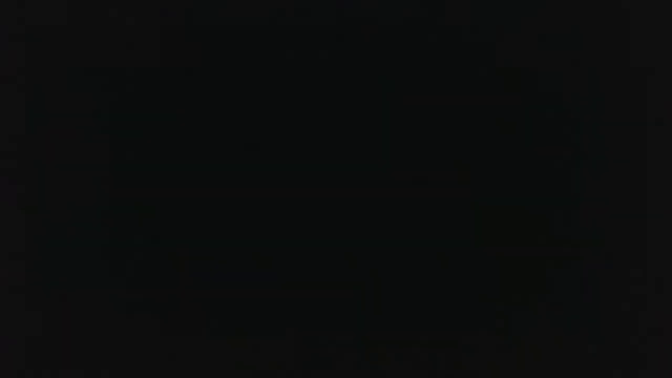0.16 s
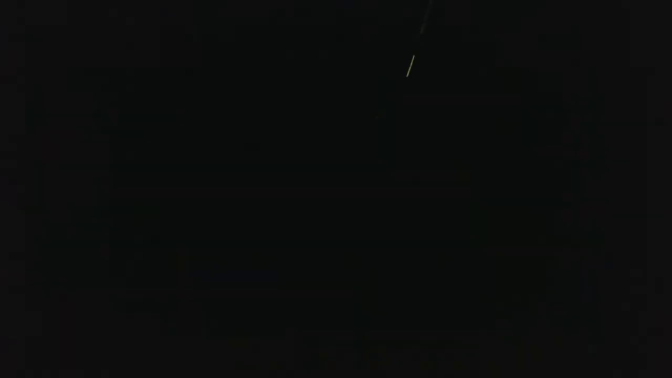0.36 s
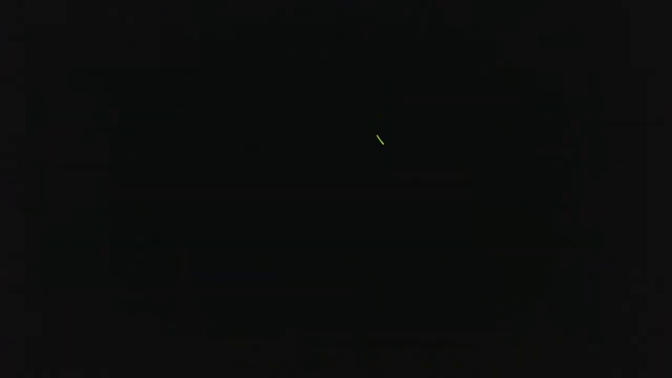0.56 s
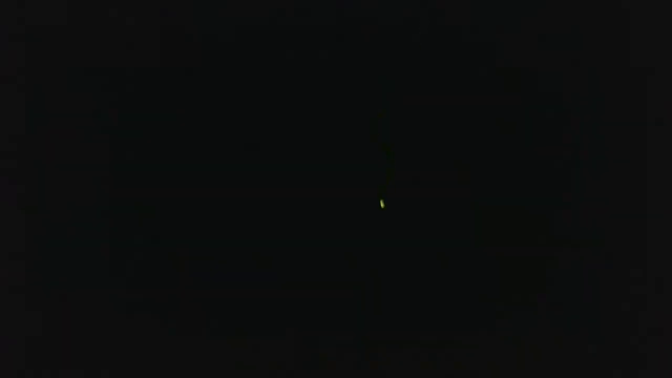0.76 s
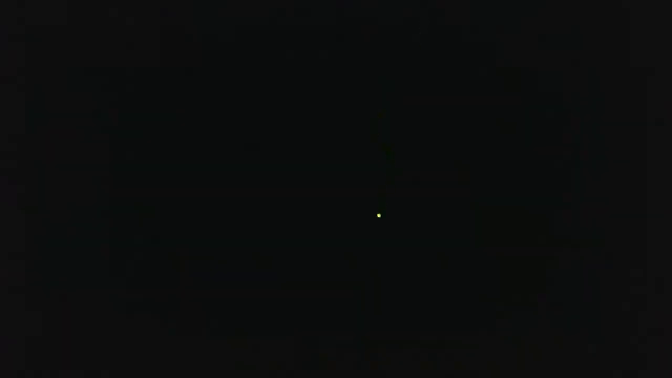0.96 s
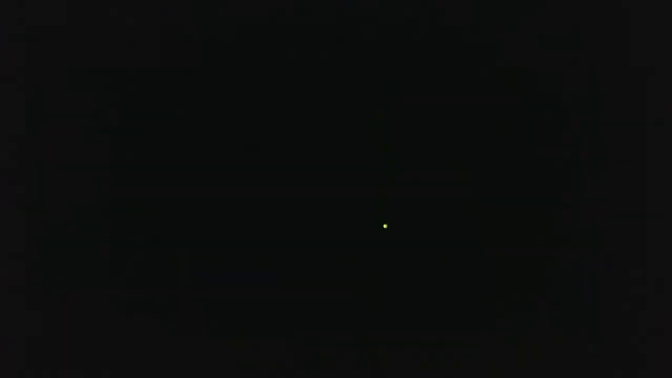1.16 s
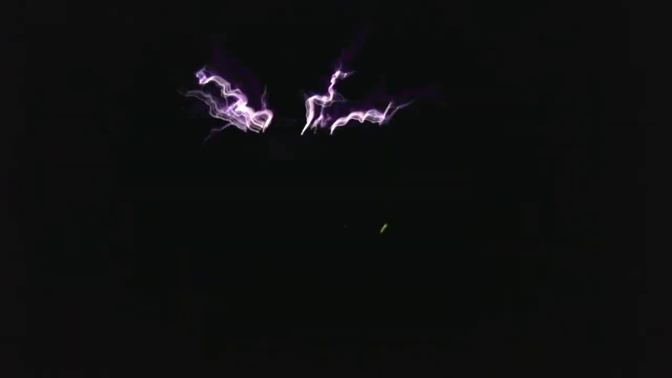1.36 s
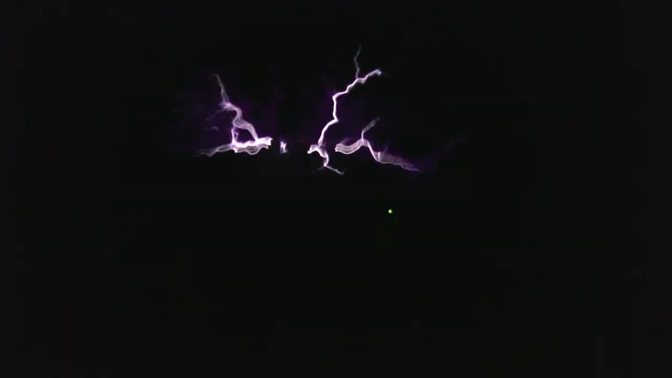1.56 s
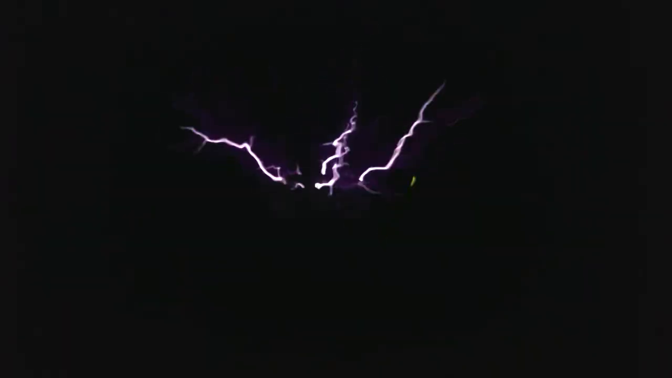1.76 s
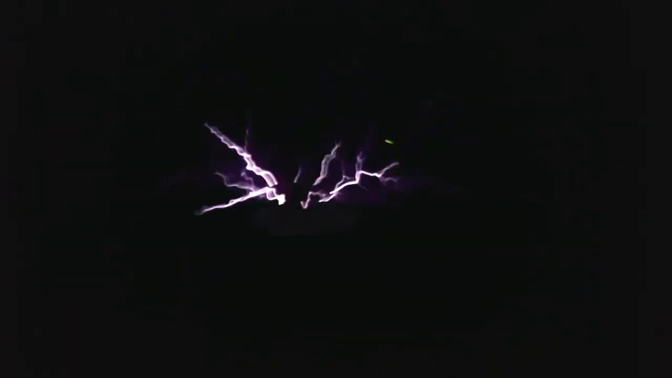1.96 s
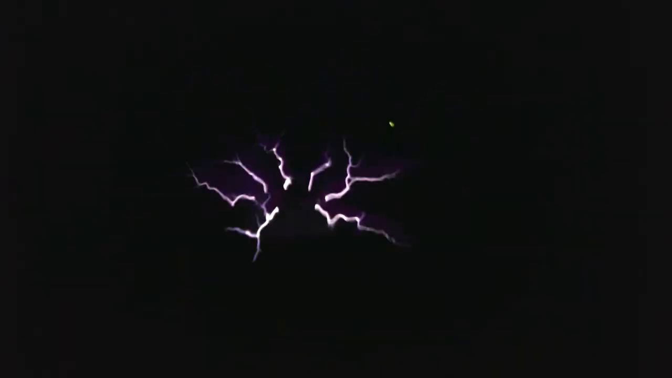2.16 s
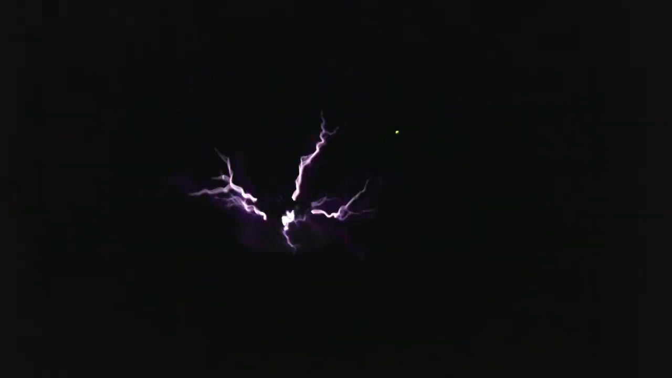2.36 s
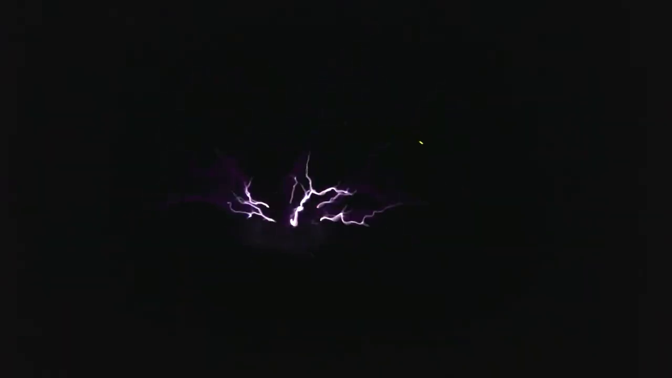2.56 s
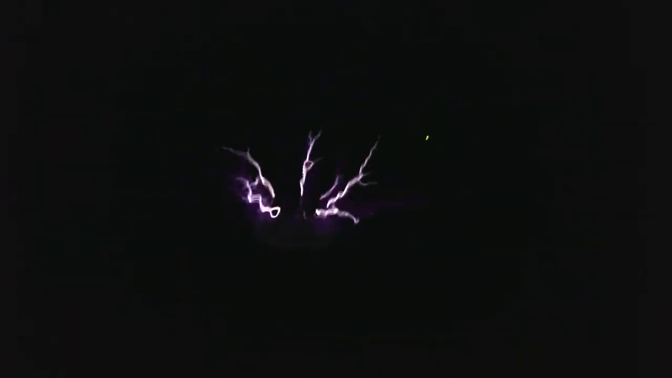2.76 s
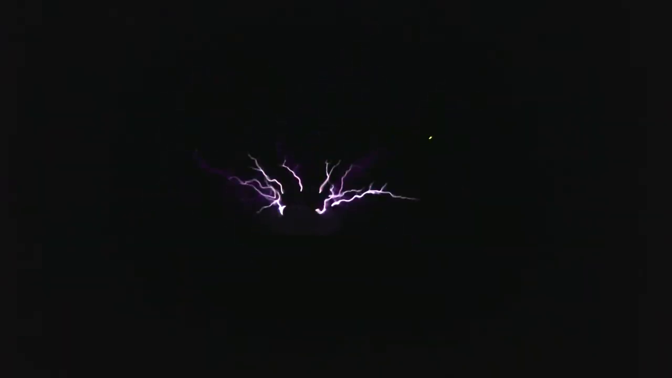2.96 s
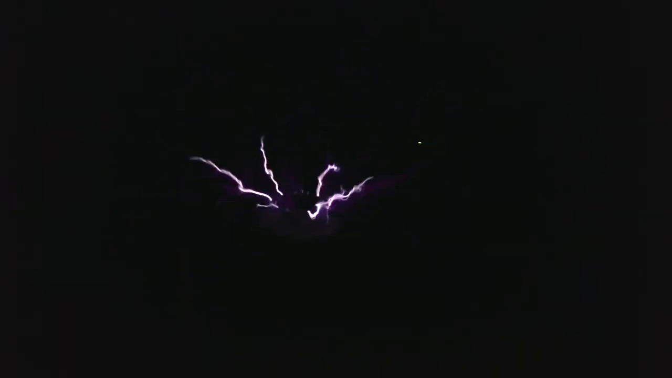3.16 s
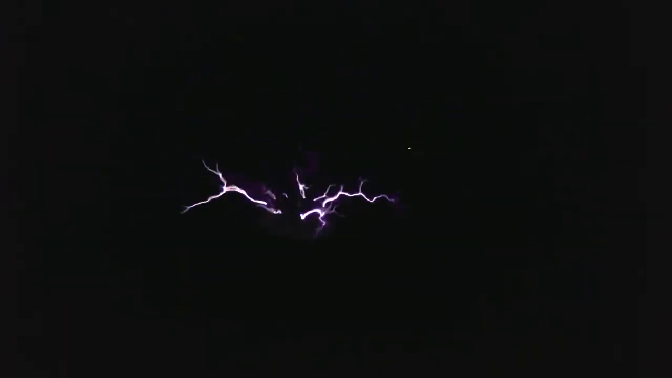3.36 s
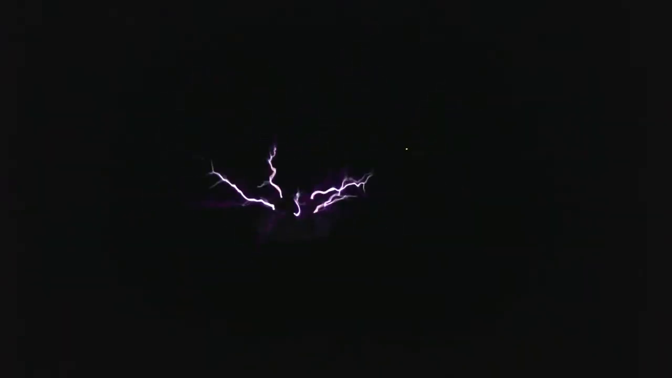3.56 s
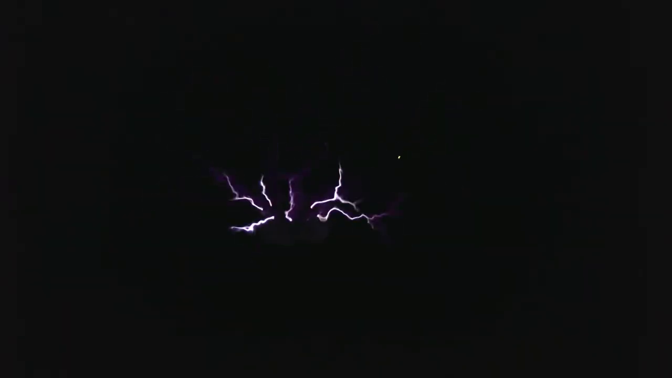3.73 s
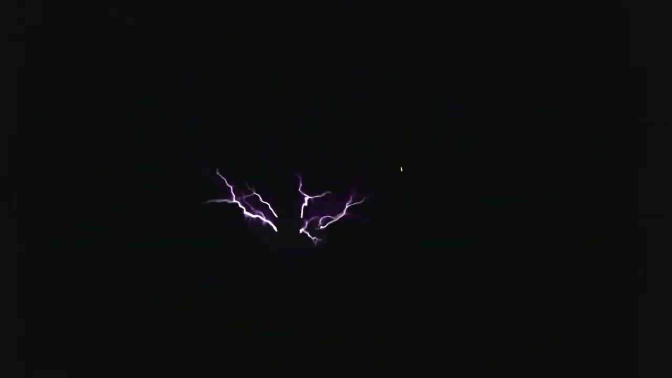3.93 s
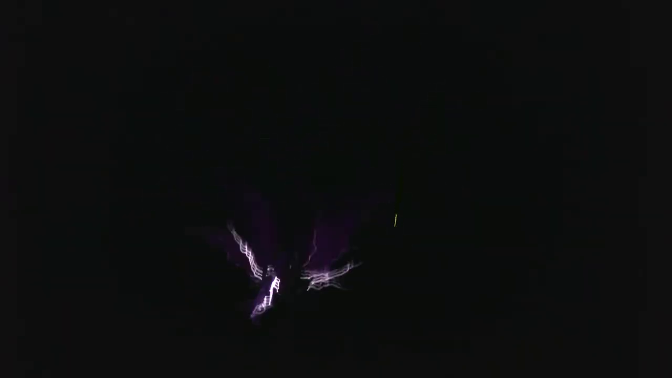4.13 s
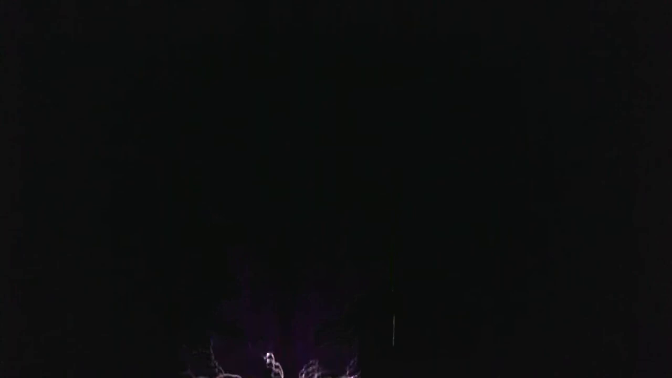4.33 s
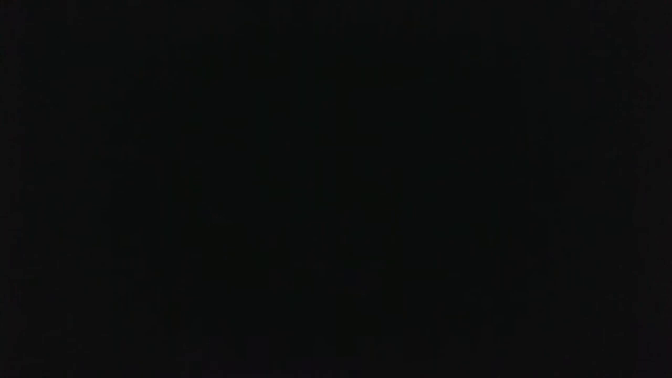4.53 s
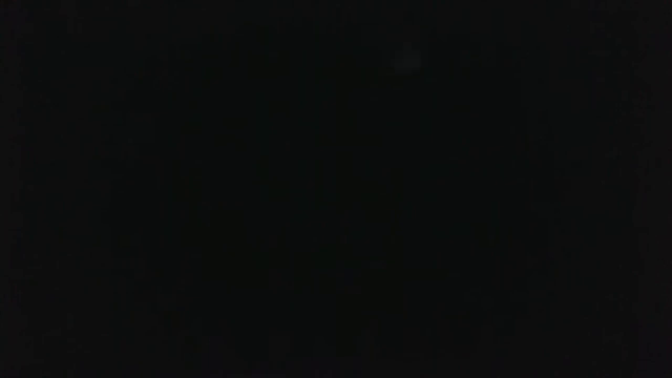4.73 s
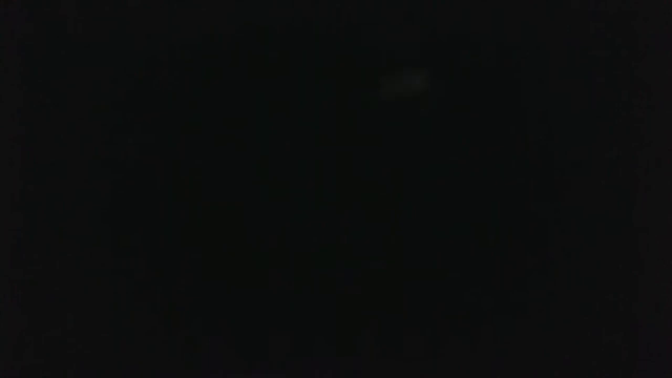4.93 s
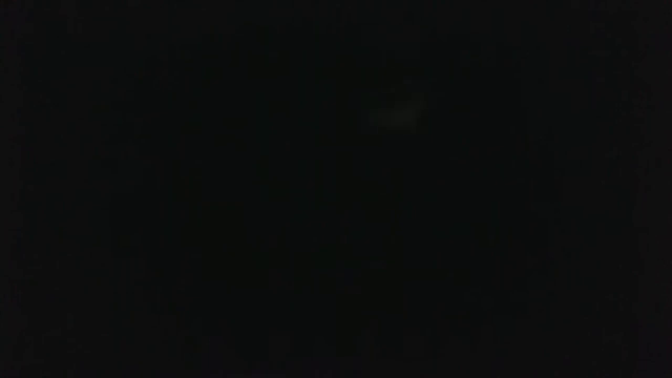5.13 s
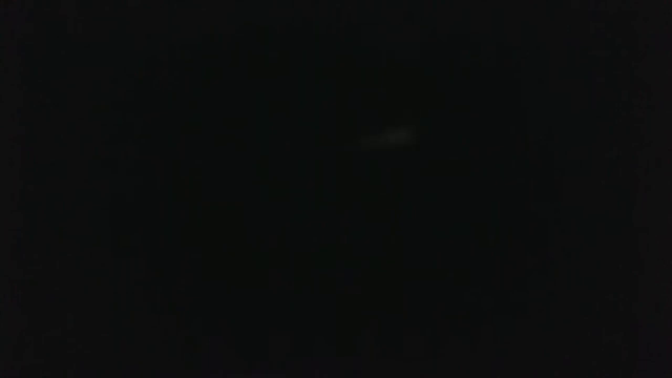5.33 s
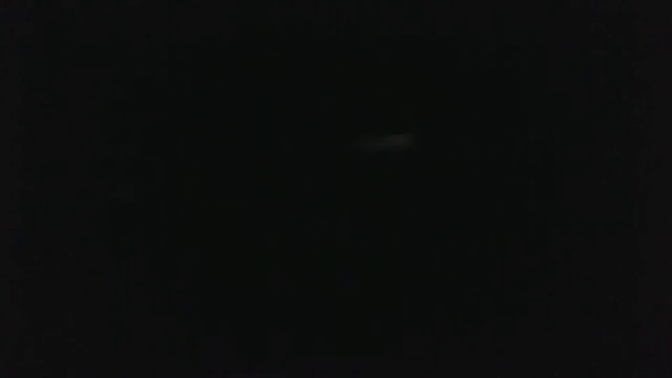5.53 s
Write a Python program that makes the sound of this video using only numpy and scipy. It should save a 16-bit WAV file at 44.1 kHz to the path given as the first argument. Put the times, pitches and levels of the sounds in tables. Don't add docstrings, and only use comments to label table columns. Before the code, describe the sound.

First a quiet second: soft cloth movement, faint electrical buzz, tiny ticks, then a tumbling cluster of metal panel knocks with low door throbs. A very loud, short switch clack cuts in, followed at once by wide, bright, buzzing spark hiss that hardly changes until the abrupt end. Hard garage walls give short echoes; the handheld stereo microphone drifts, subtly shifting the tone.

```python
import sys
import numpy as np
from scipy import signal
from scipy.fft import rfft, irfft, next_fast_len
from scipy.io import wavfile

SR = 44100
rng = np.random.default_rng(int(sys.argv[2]) if len(sys.argv) > 2 else 0)


def output_pcm(signal):
    pcm = np.clip(np.atleast_2d(signal).T, -1, 1) * 32767
    wavfile.write(sys.argv[1], SR, np.round(pcm).astype(np.int16))


def amplitude_ratio(level_db):
    exponent = np.asarray(level_db, float) / 20
    return 10 ** exponent


N = 250929
TIME = np.arange(N) / SR
SIZE = next_fast_len(N + SR)
HZ = np.maximum(np.arange(SIZE // 2 + 1) * SR / SIZE, 1)
MAINS_HZ = 120.0
COIL_START_S = 1.2185


def rms_one(x):
    return x / np.sqrt(np.mean(x ** 2) + 1e-20)


def in_time(rows):
    s, *columns = np.transpose(rows)
    return [np.interp(TIME, s, column) for column in columns]


def at_hz(points, hz=HZ):
    table_hz, values = np.array(points).T
    return np.interp(np.log(hz), np.log(table_hz), values)


def colour(x, spectrum):
    return rms_one(irfft(rfft(x, SIZE) * amplitude_ratio(at_hz(spectrum)), SIZE)[..., :N])


def resonate(x, hz, width_hz):
    r = np.exp(-np.pi * width_hz / SR)
    poles = [1, -2 * r * np.cos(2 * np.pi * hz / SR), r * r]
    return signal.lfilter([(1 - r * r) / 2, 0, (r * r - 1) / 2], poles, x)


def ring(clicks, hz, t60):
    r, w = amplitude_ratio(-60 / (t60 * SR)), 2 * np.pi * hz / SR
    return signal.lfilter([0, np.sin(w)], [1, -2 * r * np.cos(w), r * r], clicks + 1e-18)


def swell(s, held_s, attack_s, fall_db_per_s, sag_db_per_s=0):
    t = np.maximum(TIME - s, 0)
    falling_s = np.maximum(t - attack_s - held_s, 0)
    return np.minimum(t / attack_s, 1) * amplitude_ratio(-sag_db_per_s * t - fall_db_per_s * falling_s)


# frequency in Hz, left-right likeness from 0 to 1.
LIKENESS = [(60, 1), (120, 0.93), (240, 0.62), (480, 1), (950, 0.96), (1890, 0.99), (3770, 0.78),
            (7520, 0.43), (15000, 0.092)]
# frequency in Hz, lead of the left in radians.
LEAD = [(0, 0), (7320, 0.25), (8270, 0), (12900, 0.57), (15200, 0.055)]


def port_responses():
    alike = np.clip(at_hz(LIKENESS), 0, 1)
    side = np.array([[1], [-1]])
    ahead = np.exp(.5j * at_hz(LEAD) * side) / np.sqrt(2)
    return np.sqrt(1 + alike) * ahead, np.sqrt(1 - alike) * side * ahead


def two_ports(shared, apart):
    together, opposed = port_responses()
    return together * shared + opposed * apart


def air():
    shared, apart = rfft(rng.standard_normal((2, N)), SIZE)
    return irfft(two_ports(shared, apart), SIZE)[:, :N]


# frequency in Hz, time to fall 60 dB in seconds.
GARAGE_T60 = [(100, 1), (1000, 0.43), (4000, 0.35), (15000, 0.19)]


def garage(x, direct_db, wet_db):
    t, tail = np.arange(SR // 2) / SR, 0
    white = rfft(rng.standard_normal((2, len(t))))
    octave = np.log2(np.maximum(np.arange(white.shape[1]) * 2, 1))
    for hz in 62.5 * 2 ** np.arange(9):
        share = np.sqrt(np.clip(1 - abs(octave - np.log2(hz)), 0, 1))
        t60 = at_hz(GARAGE_T60, hz)
        tail = tail + irfft(white * share) * amplitude_ratio(-60 * t / t60) / np.sqrt(t60)
    tail = tail * np.minimum(t / 0.007, 1)
    tail = rfft(tail / np.sqrt(np.sum(tail[0] ** 2)), SIZE)
    direct = amplitude_ratio(direct_db) * port_responses()[0]
    path = direct + amplitude_ratio(wet_db) * two_ports(*tail)
    return irfft(rfft(x, SIZE) * path, SIZE)[:, :N]


# frequency in Hz, spectrum level in dB per Hz.
RUMBLE = [(15, -70), (30, -49), (60, -21), (89, -17), (189, -17.5), (295, -18), (782, -47), (1500, -40),
          (3300, -90)]
# frequency in Hz, spectrum level in dB per Hz.
SHUFFLE = [(200, -40), (372, -9), (446, -2), (922, -4), (1420, -16), (2000, -8.5), (3460, -14.5),
           (8000, -19), (15500, -29)]
# frequency in Hz, spectrum level in dB per Hz.
SELF_NOISE = [(60, -35), (500, 9), (2000, -3), (6000, -9), (15500, -16)]
# start in seconds, hold in seconds, then cloth, sole and floor levels in dB.
SHIFTS = [
    (-.05, .35, -52.5, -56, -66),
    (.6, 0.023, -56, -80, -54.5),
    (1.18, .04, -52, -91, -70),
]
CLOTH_DB_PER_S, SOLE_DB_PER_S, FLOOR_DB_PER_S = 64, 77, 41
RUMBLE_DB, RUMBLE_CLAMPED_DB, RUMBLE_DB_PER_M = -60.5, -66.5, -4


def quiet():
    falls = [CLOTH_DB_PER_S, SOLE_DB_PER_S, FLOOR_DB_PER_S]
    cloth, sole, floor = (sum(amplitude_ratio(row[2 + k]) * swell(row[0], row[1], 0.015, fall) for row in SHIFTS)
                          for k, fall in enumerate(falls))
    before = TIME < COIL_START_S
    away_m = in_time(STREAMERS)[1]
    clamped = amplitude_ratio(RUMBLE_CLAMPED_DB + RUMBLE_DB_PER_M * away_m)
    rumble = np.where(before, amplitude_ratio(RUMBLE_DB) + floor, clamped) * colour(air(), RUMBLE)
    self_noise = amplitude_ratio(-55.5) * colour(rng.standard_normal((2, N)), SELF_NOISE)
    scuff = sole * rms_one(resonate(rng.standard_normal(N), 1410, 340))
    buzz = before * amplitude_ratio(-68) * np.sqrt(2) * np.sin(2 * np.pi * 7 * MAINS_HZ * TIME)
    return buzz + scuff + rumble + cloth * colour(air(), SHUFFLE) + self_noise


# start in seconds, peak in dB, ring in Hz, time to fall 60 dB in seconds.
CLUNKS = [(.06, -41, 380, 0.055), (.194, -32, 904, .07), (.195, -38, 502, 0.13), (.2005, -37, 2500, .025),
          (.2505, -39, 890, .05), (.2515, -43, 2400, .05), (1.2225, -9, 2000, 0.021),
          (1.2255, -10, 2140, .018), (1.2298, -9, 850, 0.026)]
# start in seconds, peak in dB, ring in Hz, 60 dB fall in seconds.
SNAPS = [(.2513, -26, 8500, 0.011), (.267, -41, 9000, .02), (.6503, -27.5, 4650, .008),
         (.6735, -36, 6200, 0.0073), (1.165, -47, 6000, .02), (.451, -41, 6300, 0.01),
         (.62, -49, 7000, .01), (.997, -46, 3500, .012), (1.142, -44, 3500, .012),
         (1.1985, -24, 6760, 0.024), (1.212, -27, 6000, .05)]
# start in seconds, peak in dB, ring in Hz, 60 dB fall in seconds.
BLOWS = [
    (1.2301, 1, 2330, 0.015),
    (1.23, 1, 6600, 0.02),
    (1.232, 8, 13000, 0.014),
    (1.2405, -8, 2050, 0.032),
]
# ring width as a share of pitch, crack level in dB.
CLUNK, SNAP, BLOW = (.16, -18), (.5, -3), (.27, 2.5)
CRACK_T60_S, THUMP_DB, TICK_WET_DB = 0.0078, -21, -11.5
GAIN_DROP_S, GAIN_DROP_DB = 1.236, -12


def ticks():
    out, t = np.zeros(N + SR), np.arange(SR // 8) / SR
    kinds = [(CLUNKS, CLUNK), (SNAPS, SNAP), (BLOWS, BLOW)]
    rows = [(*row, *kind) for table, kind in kinds for row in table]
    for s, db, hz, t60, share, crack_db in rows:
        rough, grit = rng.standard_normal((2, len(t)))
        clear = 1.27 * np.exp(-4 * share)
        tone = clear * np.sin(2 * np.pi * hz * t)
        body = (tone + .5 * rms_one(resonate(rough, hz, share * hz))) * amplitude_ratio(-60 * t / t60)
        crack = .5 * resonate(grit, 4700, 14000) * amplitude_ratio(crack_db - 60 * t / CRACK_T60_S)
        out[round(s * SR):][:len(t)] += amplitude_ratio(db) * (body + crack)
    no_bass = signal.butter(3, 290, "high", fs=SR, output="sos")
    out = signal.sosfilt(no_bass, out + 1e-18)
    thump = amplitude_ratio(THUMP_DB) * np.sin(2 * np.pi * 30 * t) * amplitude_ratio(-60 * t / 0.028)
    out[round(1.23 * SR):][:len(t)] += thump
    clamp = amplitude_ratio(GAIN_DROP_DB * np.clip((TIME - GAIN_DROP_S) / 0.0089, 0, 1))
    return clamp * garage(out[:N], -0.37, TICK_WET_DB)


# start in seconds, hold in seconds, rms level in dB, pitch in Hz.
PUSHES = [
    (.436, 0.084, -41.5, 89),
    (.59, .12, -57, 88),
    (.73, 0.14, -47.5, 94),
    (.965, .13, -49, 88.8),
]
PUSH_ATTACK_S, PUSH_SAG_DB_PER_S, PUSH_RELEASE_DB_PER_S = 0.022, 38, 400.0


def door():
    out = 0
    for s, held_s, db, hz in PUSHES:
        push = swell(s, held_s, PUSH_ATTACK_S, PUSH_RELEASE_DB_PER_S, PUSH_SAG_DB_PER_S)
        out = out + np.sqrt(2) * amplitude_ratio(db) * push * np.sin(2 * np.pi * hz * (TIME - s))
    return out


# start in seconds, peak in dB, softness (low-pass corner) in Hz.
KNOCKS = [(.438, -26, 2920), (.450, -31, 3600), (.455, -26.5, 3480), (.466, -27, 3000), (0.48, -39, 3300),
          (.51, -40, 3600), (.526, -35, 3300), (.545, -41, 3600), (.562, -39, 3300), (.584, -43, 3300),
          (.61, -37, 3300), (.621, -43, 3300), (.635, -49, 3300)]
# frequency in Hz, level in dB, time to fall 60 dB in seconds.
PANEL = [(262, -14, 0.4), (312, -4, 0.11), (412, -2.5, 0.1), (486, -2, .08), (618, -9, .12),
         (790, -2, 0.068), (1120, -7, 0.08), (1360, -9, 0.07), (2369, -6, .08), (2433, -10, 0.2),
         (2500, -8, .2), (2606, -5.5, 0.063), (2880, -10, .06), (3268, -8, .06)]
SLAP_DB, SLAP_T60_S = 7.5, 0.058
HAZE_DB, HAZE_HZ = -24, 5500
KNOCK_WET_DB = -4


def panel():
    t = TIME[:3 * SR // 2]
    out = np.zeros(len(t))
    for s, db, soft_hz in KNOCKS:
        grit = rng.standard_normal(len(t))
        soften = signal.butter(4, soft_hz, fs=SR, output="sos")
        impulse = 1. * (np.arange(len(t)) == round(s * SR))
        click = signal.sosfilt(soften, impulse + 1e-18)
        dying = (t >= s) * amplitude_ratio(np.clip(-60 * (t - s) / SLAP_T60_S, -200, 0))
        slap = signal.sosfilt(soften, resonate(grit * dying + 1e-18, 680, 1900))
        haze = resonate(grit * np.sqrt(dying) + 1e-18, HAZE_HZ, 4000)
        out += amplitude_ratio(db + SLAP_DB) * slap + amplitude_ratio(db + HAZE_DB) * haze
        for hz, mode_db, t60 in PANEL:
            out += amplitude_ratio(db + mode_db - 7.0 + rng.normal(0, 3)) * ring(click, hz, t60)
    return garage(out, -4.5, KNOCK_WET_DB)


SPARKS_PER_S, SPARK_SPREAD_DB, MAINS_DEPTH, DIRECT_DB = 2500.0, 2.5, .65, -5.5
WANDER_PER_S, PLACES_LIT = 4.0, 3.0


def sparks(count=12):
    bunching = 1 + MAINS_DEPTH * np.cos(2 * np.pi * MAINS_HZ * TIME)
    sizes = amplitude_ratio(SPARK_SPREAD_DB * np.minimum(rng.exponential(1, N), 5)) * rng.choice([-1, 1], N)
    snaps = sizes * (rng.random(N) < SPARKS_PER_S * bunching / SR)
    place = (WANDER_PER_S * TIME + PLACES_LIT * rng.random(N)).astype(int) % count
    return sum(garage(snaps * (place == k), DIRECT_DB, 0) for k in range(count))


# time in seconds, level in dB, microphone's distance from the wall in metres.
STREAMERS = [(1.25, -15, .2), (1.31, -15, .2), (2.41, -14.5, 0.05), (2.57, -16.5, 0.99), (3.2, -16, 0.99),
             (3.92, -16, 0.57), (4.9, -17, 0.11), (5.69, -16, 0.02)]
# frequency in Hz, spectrum level in dB per Hz.
SPARK = [(30, -54), (170, -28.5), (241, -23.5), (330, -14), (461, -12), (563, -5.5), (999, -9), (2010, -5),
         (3300, -3.5), (4300, -2.5), (5500, -4), (7730, -3), (13400, -1), (15700, -3)]
# frequency in Hz, width in Hz, level by the wall in dB, change in dB per metre away.
STANDING_MODES = [(324.6, 26, -62.5, 2), (418, 43, -47.5, -17), (561.5, 22, -58, 14), (718, 36, -65, 19.5)]
# multiple, left lead in radians, rms at switch-on in dB, drift in dB per second.
HUM = [
    (1, 0.82, -58.5, -1.7),
    (2, 0.88, -59, .2),
]
LOWER_MID_HZ, LOWER_MID_DB, LOWER_MID_DB_PER_M = 2100, -1.07, -1
PORT_HZ, PORT_WIDTH_HZ = 7830, 1040
PORT_DB, PORT_DB_PER_S = -7.0, 1.05
STREAMER_RISE_S = 0.0013


def coil():
    level_db, away_m = in_time(STREAMERS)
    on_s = TIME - COIL_START_S
    white = rms_one(sparks())
    hiss = colour(white, SPARK)
    lower = signal.sosfilt(signal.butter(2, LOWER_MID_HZ, fs=SR, output="sos"), hiss)
    thinning = amplitude_ratio(LOWER_MID_DB + LOWER_MID_DB_PER_M * away_m) - 1
    port = amplitude_ratio(PORT_DB + PORT_DB_PER_S * on_s) * resonate(hiss, PORT_HZ, PORT_WIDTH_HZ)
    hiss = hiss + thinning * lower + port
    waves, hum = 0, 0
    for hz, width_hz, db, db_per_m in STANDING_MODES:
        wave = resonate(resonate(white, hz, width_hz), hz, width_hz)
        waves = waves + amplitude_ratio(db + db_per_m * away_m) * rms_one(wave)
    for multiple, lead, db, db_per_s in HUM:
        tone = np.sin(2 * np.pi * multiple * MAINS_HZ * TIME + [[lead], [0]])
        hum = hum + np.sqrt(2) * amplitude_ratio(db + db_per_s * on_s) * tone
    switched_on = np.clip(on_s / STREAMER_RISE_S, 0, 1) ** 2
    return switched_on * (amplitude_ratio(level_db) * hiss + waves + hum)


def scene():
    return quiet() + ticks() + door() + panel() + coil()


def band_limit(x):
    return signal.sosfilt(signal.butter(12, 15690, fs=SR, output="sos"), x)


def record(dry):
    clipped = np.clip(dry, -1, 1)
    return band_limit(clipped)


dry = scene()
out = record(dry)
output_pcm(out)
```